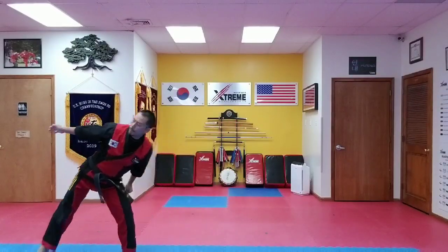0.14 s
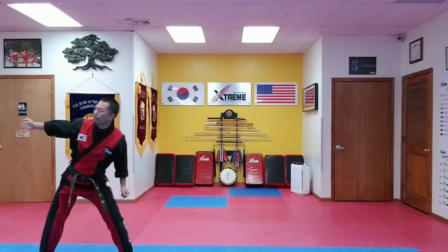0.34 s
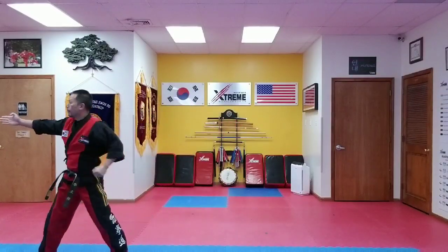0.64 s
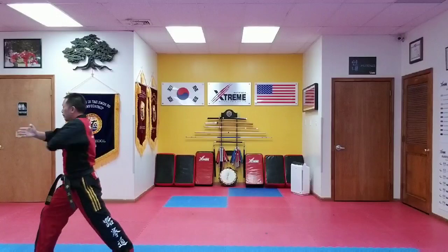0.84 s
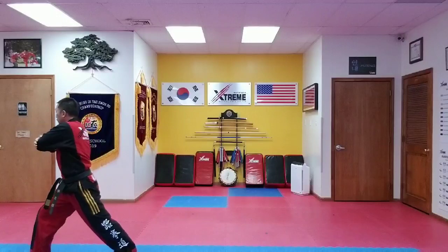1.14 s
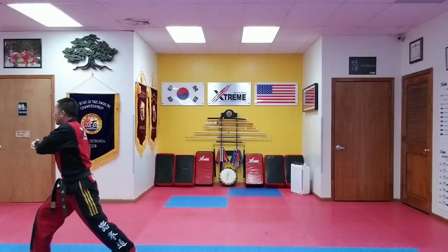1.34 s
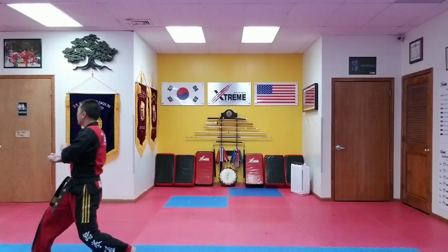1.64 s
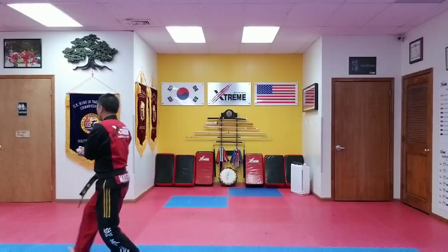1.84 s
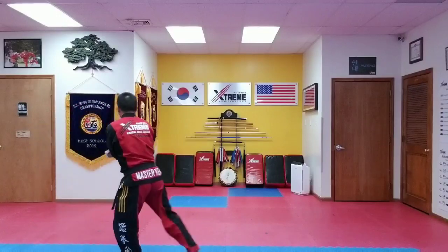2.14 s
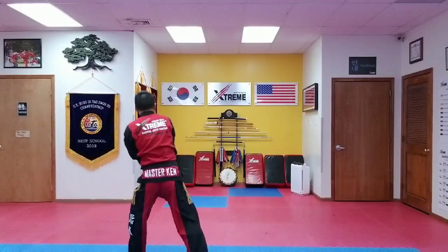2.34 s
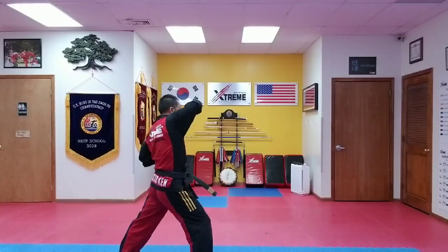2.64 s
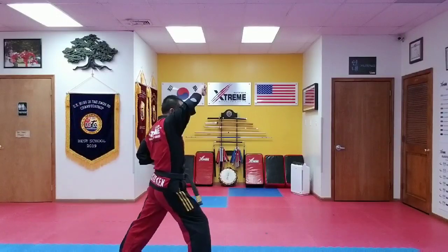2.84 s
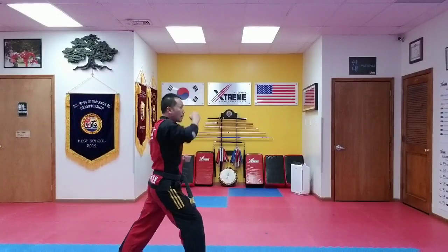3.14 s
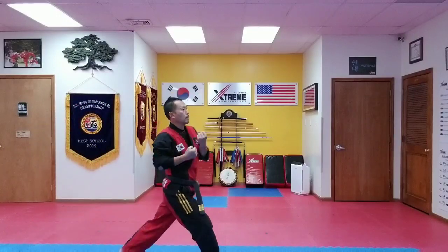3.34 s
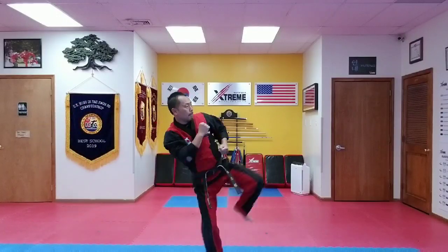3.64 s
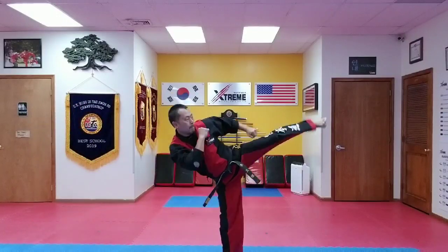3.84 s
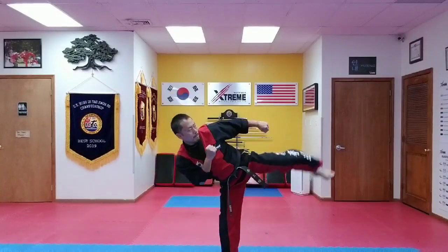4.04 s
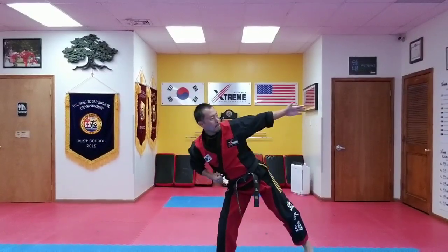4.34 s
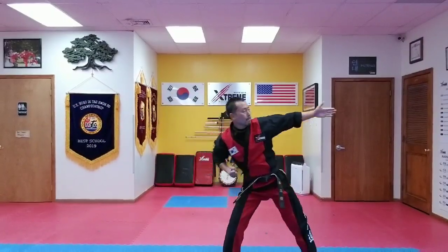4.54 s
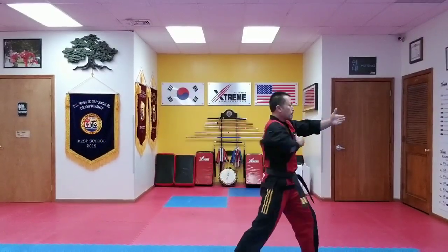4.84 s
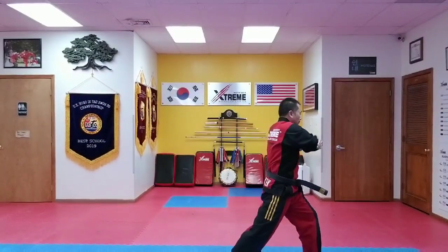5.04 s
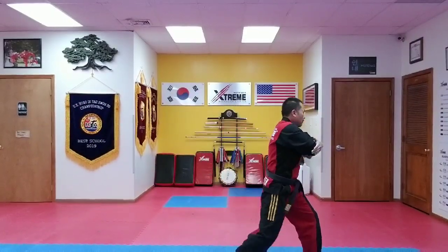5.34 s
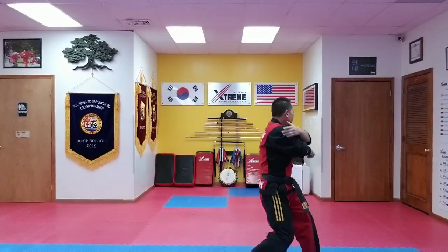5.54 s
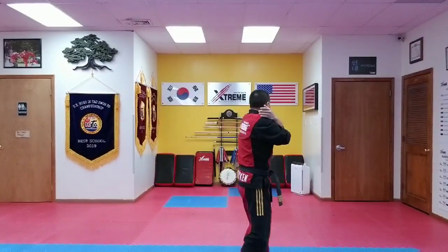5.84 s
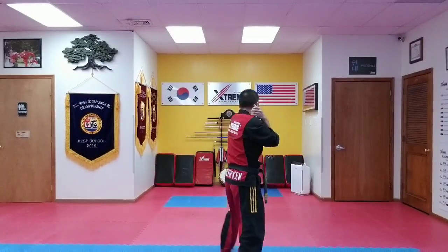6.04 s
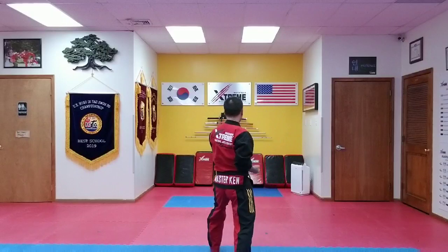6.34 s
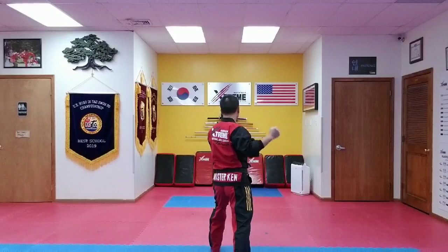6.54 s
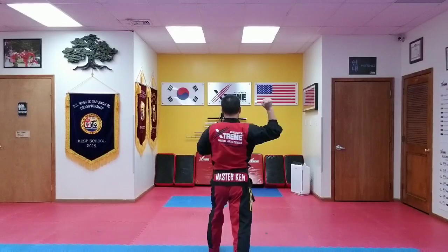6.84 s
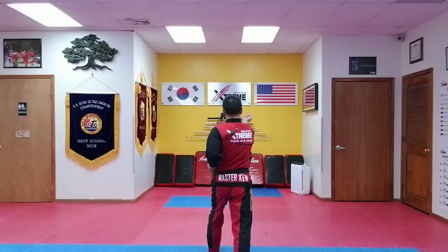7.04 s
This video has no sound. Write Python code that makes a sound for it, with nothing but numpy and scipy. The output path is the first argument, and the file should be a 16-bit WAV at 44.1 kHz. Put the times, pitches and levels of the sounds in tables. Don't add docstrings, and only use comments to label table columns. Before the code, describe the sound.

A low electrical hum, compressor and drifting fan tone throb together throughout, with duct rumble and thin hiss, in a small hard-walled hall. A few metres away someone performs on foam mats. At 0.3 to 0.9 s there are soft leg flicks and light foot scuffs; at 1.03 s a dull, short hand slap. Small cloth ticks come near 1.5, then a strong swish and slide at 1.9. Around 2.4 a foot lands with a soft thump, peeling clicks and a pivot rub. A sleeve snaps at 3.2, a step follows at 3.5, and a swish and scuff at 3.8. At 4.65 to 4.75 a dense flurry of ticks and rubs brings a booming landing; at 5.02 a bright slap rings out, and the boards shudder. Heavy steps at 5.5 to 5.8 carry a snap, squeak and brisk rustle. From 6.2 quieter pivots and cloth settle into the hum by about 7.

```python
import sys
import numpy as np
from scipy import signal
from scipy.fft import rfft, irfft, next_fast_len
from scipy.io import wavfile
from scipy.ndimage import uniform_filter1d, map_coordinates

SR = 44100
rng = np.random.default_rng(int(sys.argv[2]) if len(sys.argv) > 2 else 0)


def field_ratio(decibels):
    return 10 ** (np.asarray(decibels, dtype=float) / 20)


def store_wav(level_fs):
    pcm = np.round(np.clip(np.atleast_2d(level_fs), -1, 1) * 32767)
    wavfile.write(sys.argv[1], SR, pcm.T.astype(np.int16))


N = 317520


def unit(x):
    return x / np.sqrt(np.mean(x ** 2) + 1e-20)


def along(points, hz):
    f, v = np.transpose(points)
    return np.interp(np.log(hz + 1), np.log(f + 1), v)


def wobble(rate_hz):
    knots = rng.standard_normal(int(N * rate_hz / SR) + 4)
    return map_coordinates(knots, [np.arange(N) * rate_hz / SR])


def coloured(x, spectrum, causal=False):
    m = next_fast_len(len(x) // 2 + 4096) * 2
    gain = field_ratio(along(spectrum, np.fft.rfftfreq(m, 1 / SR)))
    if causal:
        cepstrum = irfft(np.log(gain + 1e-6), m)
        folded = np.r_[cepstrum[0], 2 * cepstrum[1:m // 2]]
        gain = np.exp(rfft(folded, m))
    return irfft(rfft(x, m) * gain, m)[:len(x)]


def rush(spectrum, grain_db=0, rate=200, patchy_db=0):
    grains = rng.standard_normal(N) * field_ratio(grain_db * wobble(rate))
    z = signal.stft(grains, nperseg=256)[2]
    field = uniform_filter1d(rng.standard_normal(z.shape), size=3, axis=0)
    field = uniform_filter1d(field, size=12, axis=1)
    patchy = signal.istft(z * field_ratio(patchy_db * unit(field)), nperseg=256)[1][:N]
    return unit(coloured(patchy, spectrum))


def narrow(hz, width_hz):
    phase = 2 * np.pi * hz * np.arange(N) / SR
    return unit(wobble(width_hz) * np.cos(phase) + wobble(width_hz) * np.sin(phase))


def strokes(rows, shift_db):
    out = np.zeros(N)
    for (s, db, rise, fall, *_), extra_db in zip(rows, np.broadcast_to(shift_db, len(rows))):
        near = slice(max(round((s - 2 * rise) * SR), 0), round((s + 2 * fall) * SR))
        t = np.arange(N)[near] / SR - s
        out[near] += field_ratio(2 * (db + extra_db - 20 * np.maximum(-t / rise, t / fall)))
    return out


def resonances(rows):
    return sum(np.sqrt(strokes([(s, db, rise, fall)], 0)) * narrow(hz, width)
               for s, db, hz, width, rise, fall in rows)


MAINS_HZ, PUMP_HZ, PAIR_HZ = 60.0165, 57.7735, 172.27
# t/s, f/Hz
FAN_HZ = [(0.0, 463.06), (0.4, 463.35), (0.8, 462.55), (1.2, 462.22), (2.0, 463.17), (2.8, 461.94),
          (3.2, 461.65), (3.6, 462.13), (4.0, 463.04), (4.4, 461.17), (4.8, 462.07), (5.2, 463.01),
          (5.6, 460.28), (6.0, 461.35), (6.4, 463.72), (6.8, 459.61), (7.2, 460.45)]
SWELL_S = .0167, .1559, .854
# multiple, level/dB rms
MAINS_TONES = [(1, -80), (2, -48), (4, -65.5)]
# multiple, level/dB rms
PUMP_TONES = [(1, -76.5), (2, -54.5), (3, -57), (4, -67.5), (5, -59.5), (6, -56), (7, -64), (9, -68.5)]
# multiple of slot tone / 11, added multiple of mains, level/dB rms
FAN_TONES = [(3, 0, -51), (6, 0, -68.5), (11, 0, -57), (11, 2, -63.5), (11, 4, -66), (10, 4, -83),
             (1, 0, -71)]
# f/Hz, level/dB rms, phase wander/rad
FAR_TONES = [(41.11, -61, .3), (54.27, -68, .5), (76.33, -68, .8), (187.6, -65, .6), (189.7, -57, .7)]


def machines():
    def tone(turns, db):
        return np.sqrt(2) * field_ratio(db) * np.cos(2 * np.pi * turns)

    t = np.arange(N) / SR
    pump_s, fan_s, pair_s = SWELL_S
    mains = MAINS_HZ * t + 1 / 8
    pump = PUMP_HZ * (t - pump_s) + mains[round(pump_s * SR)]
    fan = np.cumsum(np.interp(t, *np.transpose(FAN_HZ))) / SR / 11
    fan = fan - fan[round(fan_s * SR)] + 2 * mains[round(fan_s * SR)] / 3
    pair = PAIR_HZ * (t - pair_s) + 3 * pump[round(pair_s * SR)]

    hum = sum(tone(k * mains, db) for k, db in MAINS_TONES)
    hum = hum + sum(tone(k * pump + (k > 3) * rng.random(), db) for k, db in PUMP_TONES)
    hum = hum + sum(tone(k * fan + m * mains + (k != 3) * rng.random(), db) for k, m, db in FAN_TONES)
    hum = hum + tone(pair, -57)
    return hum + sum(tone(hz * t + rng.random() + rad * wobble(1.18) / (2 * np.pi), db)
                     for hz, db, rad in FAR_TONES)


# f/Hz, level/dB rms, change rate/Hz
FLUTTER = [(241.1, -65.5, 12), (664, -75, 5), (2800, -92.5, 40), (347.7, -67, 8)]


def flutter():
    return sum(field_ratio(db) * narrow(hz, rate) for hz, db, rate in FLUTTER)


# f/Hz, level/dB per Hz
VENT = [(15, -37), (26, -10), (38, -14), (49, -12), (60, -4), (72, -10.5), (98, -6), (124, -5), (236, -8),
        (420, -13), (600, -18), (760, -25.5), (1500, -43.5), (2200, -93)]
# f/Hz, level/dB per Hz
HISS = [(710, -17), (1200, -2), (1400, -19.5), (1540, -2.5), (2240, -9.5), (2810, -5.5), (3340, -14.5),
        (4430, -11), (4980, -10), (6520, -17.5), (7670, -18), (8640, -24), (12500, -8.5), (15800, -12.5)]


def air():
    return field_ratio(-50.5) * rush(VENT, grain_db=0.5, rate=2.67) + field_ratio(-74.5) * rush(HISS)


# f/Hz, level/dB per Hz
SHEEN = [(6000, -19), (9000, -7.5), (11000, -4), (13000, -2.5), (14300, -2), (15200, 2.5), (16500, -16.5)]
# f/Hz, level/dB per Hz
RUSTLE = [(2000, -25), (3800, 3), (4500, 3.5), (5500, 2.5), (6800, 2), (7350, 3.5), (8200, -4.5),
          (8900, -20), (11000, -27)]
# peak t/s, level/dB, rise/s, fall/s, sheen over rustle/dB
SWEEPS = [(.5, -68.5, 0.097, 0.1, 2.2), (.765, -74, 0.08, 0.14, 4), (.876, -74, .08, 0.19, 2),
          (5.61, -75, .15, .15, 5), (1.02, -77, .35, 0.39, 2), (1.764, -74.5, .05, 0.67, -1),
          (1.935, -57.5, 0.068, 0.13, -0.5), (2.397, -69, 0.069, 0.19, 2.5), (2.523, -65.5, 0.11, 0.4, 2.5),
          (2.78, -72.5, 0.52, 0.08, -2), (3.27, -75, 0.23, .25, 2), (3.516, -75, 0.057, 0.37, 0),
          (3.77, -63.5, 0.17, 0.18, 0.5), (4.1, -82, 0.51, .3, -3), (4.346, -81, 0.31, 0.43, 2.2),
          (4.704, -67, 0.074, 0.14, 3), (4.89, -70, 0.14, 0.43, 1.5), (5.525, -77, 0.07, .12, 9),
          (5.725, -69.5, 0.1, 0.036, 1), (5.865, -64, 0.12, 0.1, 7), (5.982, -72.5, 0.081, 0.14, 8),
          (6.245, -69, 0.039, 0.17, 3.5), (6.906, -78, .1, 0.62, 4)]
# peak t/s, level/dB, fall/s, sheen over rustle/dB
FLICKS = [
    (.29, -78.5, 1.1, 2),
    (.456, -69, 0.21, -2.2),
    (.735, -71.5, 0.27, -1),
    (1.52, -75.5, 0.34, 0),
    (1.903, -63.5, 0.084, 16),
    (2.352, -79, .2, 3),
    (3.18, -69.5, 0.38, 4.5),
    (5.497, -75, .3, 5),
    (5.785, -61, 0.26, 4.5),
    (6.215, -71, 0.32, 1),
]
FLICK_RISE_S = 0.021
STILL_DB = -98, -86.5, -84, -82.5


def cloth():
    sweeps = SWEEPS + [(s, db, FLICK_RISE_S, fall, bright_db) for s, db, fall, bright_db in FLICKS]
    bright_db = np.transpose(sweeps)[-1]
    sheen = np.sqrt(strokes(sweeps, bright_db) + field_ratio(2 * STILL_DB[0]))
    rustle = np.sqrt(strokes(sweeps, 0) + field_ratio(2 * STILL_DB[1]))
    out = sheen * rush(SHEEN, grain_db=0.5, rate=250, patchy_db=2.0)
    return out + rustle * rush(RUSTLE, grain_db=0.8, rate=180, patchy_db=1.5)


# f/Hz, level/dB per Hz
SCRAPE = [(900, -34), (1400, -0.5), (2000, -2), (2600, -6), (3500, -8.5), (5000, -27)]
# f/Hz, level/dB per Hz
DRAG = [(350, -41), (650, 5), (1000, 2), (1300, -3.5), (1900, -50)]
# peak t/s, level/dB, rise/s, fall/s, drag over scrape/dB
SLIDES = [(.458, -65, .02, 0.19, 2.2), (.5, -67.5, 0.16, 0.089, -3), (.76, -75, 0.23, 0.27, -9),
          (.876, -74, 0.072, .3, -2), (1.01, -73, 0.41, 0.99, 7), (1.52, -70.5, .02, 0.24, -2.2),
          (1.78, -75, .06, .8, 3), (1.912, -57.5, 0.042, 0.17, 2), (2.402, -68, .012, 0.2, 2),
          (2.53, -65.5, 0.37, 0.62, 1.5), (2.78, -73.5, .4, 0.14, 8), (3.42, -70, 0.43, .2, 5.5),
          (3.516, -66, 0.025, 0.16, 0), (3.77, -62, 0.23, 0.24, -0.5), (4.14, -77, .4, 0.14, 4),
          (4.346, -74, 0.22, 0.28, 4), (4.718, -58.5, 0.039, 0.13, 6.5), (4.97, -70.5, 0.32, .3, 5),
          (5.497, -72.5, 0.022, 0.43, 2), (5.793, -67, .025, 0.25, -14), (5.822, -59, 0.053, 0.15, -7),
          (6.284, -65, 0.13, 0.19, 0), (6.978, -75.5, .03, .45, 6), (7.19, -85, .1, 0.16, 4)]
# peak t/s, level/dB, rise/s, fall/s
PIVOTS = [(.292, -65, .012, 0.31), (6.205, -68, .015, .3), (2.252, -70, 0.073, .3),
          (2.465, -55, .04, 0.077), (3.127, -75, 0.046, 0.025), (3.27, -65, 0.14, 0.48),
          (3.95, -58, 0.03, 0.11), (4.662, -54, 0.02, 0.057), (5.651, -63, .06, 0.23),
          (6.562, -70, .08, .6), (6.906, -66, 0.15, 0.054)]
PIVOT_SCRAPE_DB = -15


def soles():
    drag_db = np.transpose(SLIDES)[-1]
    scrape_power = strokes(SLIDES, 0) + strokes(PIVOTS, PIVOT_SCRAPE_DB)
    drag_power = strokes(SLIDES, drag_db) + strokes(PIVOTS, 0)
    scrape = np.sqrt(scrape_power + field_ratio(2 * STILL_DB[2]))
    drag = np.sqrt(drag_power + field_ratio(2 * STILL_DB[3]))
    out = scrape * rush(SCRAPE, grain_db=-0.3, rate=220, patchy_db=0.5)
    return out + field_ratio(-1.5) * drag * rush(DRAG, grain_db=-0.5, rate=58)


# f/Hz, t60/s
HALL_T60 = [(300, 0.45), (1000, 0.31), (2500, 0.43), (5000, 0.33), (10000, 0.21)]


def hall_tail():
    hz, t, z = signal.stft(rng.standard_normal(SR), SR, nperseg=256)
    decay = field_ratio(-60 * t / along(HALL_T60, hz)[:, None])
    late = signal.istft(z * decay, SR, nperseg=256)[1]
    late = late * (1 - np.exp(-np.arange(len(late)) / SR / .022))
    return late / np.linalg.norm(late)


# f/Hz, level/dB
CONTACT = [(700, 0), (1500, 0), (3500, -6), (7500, -7), (8900, -14), (11500, -6), (16000, -5)]
# t/s, peak level/dB, top f/Hz
PEELS = [(0.2908, -62, 7000), (2.241, -52, 3020), (2.396, -46.5, 1800), (2.4241, -52, 1800),
         (2.4626, -49, 1900), (2.468, -53, 1500), (2.476, -63, 2800), (2.479, -50, 2900),
         (2.7526, -46.5, 2820), (3.2793, -52.5, 2200), (3.5178, -49, 3000), (3.641, -57, 1600),
         (3.9469, -51, 1760), (3.9478, -59, 1790), (4.6662, -49, 2100), (4.6835, -47, 2400),
         (4.7204, -51, 2300), (4.726, -50, 1900), (4.7335, -52, 1400), (4.741, -55, 2000),
         (4.764, -54, 1900), (4.7498, -46, 4500), (5.4141, -60, 2000), (5.501, -46, 3180),
         (5.6581, -52, 2100), (5.6764, -46.5, 3480)]
# t/s, peak level/dB, middle f/Hz
TAPS = [(1.5187, -64, 7500), (1.768, -55, 5400), (1.835, -57, 6500), (2.3555, -54, 5000),
        (2.3618, -57, 4300), (2.3675, -54, 6000), (2.3966, -46, 3700), (2.4035, -49, 2600),
        (2.4752, -53, 2600), (4.6353, -62, 5500), (4.6482, -60, 4300), (4.663, -56, 3300),
        (4.6785, -54, 4200), (4.7075, -50, 3400), (4.7128, -54, 5800), (4.7208, -52, 3700),
        (4.7532, -52, 3300), (4.6556, -55, 7000), (4.702, -49.5, 4180), (5.3204, -63, 8500),
        (5.4921, -58, 5070)]
# t/s, peak level/dB, bottom f/Hz
SNAPS = [(1.5359, -52, 4000), (1.5581, -55, 11000), (1.8273, -58.5, 12000), (1.8349, -50, 12000),
         (2.35, -46, 1200), (2.3966, -48, 6500), (3.1787, -44, 5060), (3.5167, -57, 5000),
         (4.6835, -46, 5500), (4.6986, -48, 6000), (4.7018, -48, 11500), (4.7216, -49, 10000),
         (5.719, -42.5, 5400)]
PEEL_LOW_HZ, TAP_SPREAD, SNAP_TOP_HZ = 830, 1.42, 15500


def contacts():
    bands = [(s, db, PEEL_LOW_HZ, hz) for s, db, hz in PEELS]
    bands += [(s, db, hz, SNAP_TOP_HZ) for s, db, hz in SNAPS]
    bands += [(s, db, hz / TAP_SPREAD, hz * TAP_SPREAD) for s, db, hz in TAPS]
    out, t = np.zeros(N), np.arange(-200, 200) / SR
    for s, db, low_hz, high_hz in bands:
        width_hz = high_hz - low_hz
        cycles = width_hz * t
        snap = -np.cos(np.pi * (low_hz + high_hz) * t) * np.sinc(cycles) * np.exp(-(cycles / 2.5) ** 2)
        grit = (t > .0001) * rng.standard_normal(len(t)) * np.exp(-abs(t) / .0006)
        chatter = (t == 0) + (.03 + width_hz / 25000) * grit
        burst = coloured(np.convolve(snap, chatter, "same"), CONTACT)
        out[round(s * SR) - 200:][:400] += field_ratio(db + .5) * burst / abs(burst).max()
    return out + field_ratio(-5) * signal.fftconvolve(out, hall_tail())[:N]


# peak t/s, level/dB, f/Hz, width/Hz, rise/s, fall/s
SQUEAKS = [(5.79, -64, 5550, 60, .012, .03), (5.812, -64, 2050, 900, .04, .1),
           (5.8, -65, 1560, 120, .02, 0.088), (5.848, -64, 8100, 280, .02, .02),
           (.47, -67, 1600, 600, .03, .08), (1.035, -57, 5600, 1200, 0.0027, .006),
           (2.397, -61, 2300, 300, .003, 0.011), (2.468, -65, 1400, 340, .015, .04),
           (3.53, -67, 1650, 300, .02, 0.1), (5.09, -55, 2050, 250, .01, .015),
           (5.0232, -50, 11000, 10000, .0012, .012), (.295, -69, 1500, 700, .006, .09)]


def squeaks():
    return resonances(SQUEAKS)


# t/s, peak level/dB, f/Hz, rise/s, t60/s
THUDS = [(.45, -62, 42, .04, 0.39), (1.88, -59, 61, .03, .3), (2.39, -46.5, 86.4, 0.014, 0.95),
         (2.428, -36, 140, 0.0092, 0.11), (2.7, -52, 40.4, .05, 0.57), (3.52, -49, 38.3, 0.046, 0.69),
         (4.68, -43, 77.6, .04, 0.85), (4.74, -46, 25, .03, .4), (4.83, -44, 45.6, .03, 1),
         (4.89, -47, 66.4, .02, 0.4), (5.026, -43.5, 289, 0.0028, 0.18), (5.031, -40, 189, 0.0042, 0.22),
         (5.038, -38, 62.4, 0.023, 0.38), (5.17, -45, 60, 0.031, 0.96), (5.52, -43, 62, 0.018, .4),
         (5.638, -34.5, 53, 0.028, 0.29), (5.75, -46, 39.7, .03, .9), (6.1, -48, 49.8, 0.026, 0.47),
         (6.3, -46.5, 71.2, .03, 1)]


def floor():
    out, t = np.zeros(N + SR), np.arange(SR) / SR
    for s, db, hz, rise, t60 in THUDS:
        swing = field_ratio(db + 3.5 - 60 * t / t60) * np.sin(2 * np.pi * hz * t)
        out[round(s * SR):][:SR] += swing * (1 - np.exp(-(t / rise) ** 2))
    return out[:N]


SLAPS = [
    1.0316,
    5.0217,
]
# f/Hz, level/dB per Hz
PALM = [(150, -54), (400, 6.5), (700, 3.5), (1300, -2), (2000, -3), (2800, -8.5), (4000, -11.5),
        (7000, -16), (9500, -21), (12000, -16), (16000, -28)]
# pulse slope/dB per octave above 2 kHz, room level/dB, room slope/dB per octave,
# flesh smack level/dB, pulse loss/dB per octave below 1.3 kHz
SLAP_TONES = [
    (-19, -9, -2.4, -46, -0.5),
    (-6, -2.5, 0.4, -30, 4.5),
]
# t/s, peak level/dB, push 1 or suction -1
PULSES = [
    [(1.034, -27, -1), (1.036, -30, -1), (1.0421, -32, -1), (1.0486, -35, -1), (1.0499, -37, -1),
     (1.0568, -34, -1), (1.0625, -34, -1), (1.0639, -37, -1), (1.0739, -36, -1), (1.0785, -39, -1)],
    [(5.0236, -26, 1), (5.0243, -35, -1), (5.0257, -32, 1), (5.0271, -31, 1), (5.0329, -30, 1),
     (5.0371, -29, 1), (5.0397, -27, -1), (5.0482, -33, -1), (5.0501, -36, -1), (5.0549, -36, 1),
     (5.0597, -45, -1), (5.0686, -39, 1), (5.0771, -38, 1), (5.0905, -45, 1)],
]
CRACK_DB, SMACK_RISE_S = -63.5, 0.001025


def slaps():
    def tilted(slope_db):
        return [(hz, db + slope_db * max(np.log2(hz / 2000), 0)) for hz, db in PALM]

    out, t = np.zeros(N + SR), np.arange(SR) / SR
    click = 1.0 * (np.arange(601) == 300)
    for s, pulses, tones in zip(SLAPS, PULSES, SLAP_TONES):
        slope_db, room_db, room_slope_db, smack_db, thin_db = tones
        start = round(s * SR)
        palm = tilted(slope_db)
        thinned = [(hz, db + thin_db * min(np.log2(hz / 1300), 0)) for hz, db in palm]
        pulse = coloured(click, thinned)
        for at, db, sign in pulses:
            out[round(at * SR) - 300:][:601] += np.sign(sign) * field_ratio(db) * pulse / pulse.max()
        smack = field_ratio(smack_db) * rng.standard_normal(SR)
        smack = smack * np.exp(-t / 0.0087) * (1 - np.exp(-t / SMACK_RISE_S))
        room = field_ratio(room_db) * hall_tail()[:SR]
        crack = field_ratio(CRACK_DB) * np.diff(rng.standard_normal(SR + 1)) * np.exp(-t / 0.05)
        out[start:][:SR] += coloured(smack, palm, causal=True)
        out[start:][:SR] += coloured(room, tilted(room_slope_db), causal=True)
        out[start:][:SR] += crack
    return out[:N]


# peak t/s, level/dB, f/Hz, width/Hz, rise/s, fall/s
SHUDDERS = [
    (4.78, -51, 45, 45, .07, 0.56),
    (5.05, -49, 65, 49.8, .04, 0.55),
    (5.72, -53, 40, 30, .1, .4),
    (6.95, -56, 55, 40, .3, 0.43),
]


def shudders():
    return resonances(SHUDDERS)


def scene():
    steady = machines() + flutter() + air()
    body = cloth() + soles() + contacts() + squeaks() + floor() + slaps() + shudders()
    return (steady + body)[None]


# f/Hz, level/dB
BAND_LIMIT = [(15700, 0), (15850, -32), (16400, -36), (16500, -90)]


def microphone(dry):
    stop = np.minimum(np.arange(N)[::-1] / 120, 1)
    return coloured(dry[0] * stop, BAND_LIMIT)[None]


def low_pass(x):
    return signal.sosfilt(signal.butter(12, 16450, fs=SR, output="sos"), x)


def record(dry):
    mix = microphone(dry)
    return low_pass(mix)


dry = scene()
out = record(dry)
store_wav(out)
```